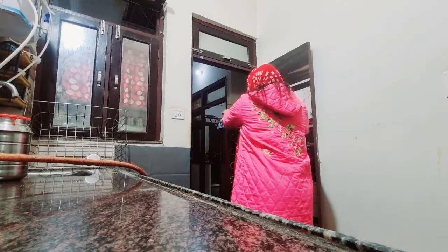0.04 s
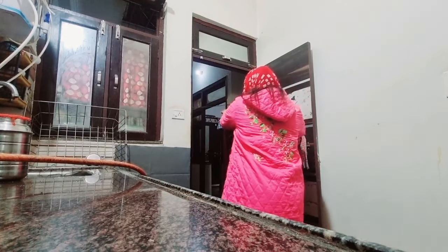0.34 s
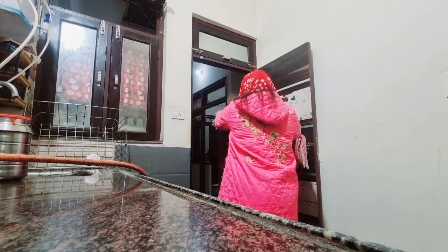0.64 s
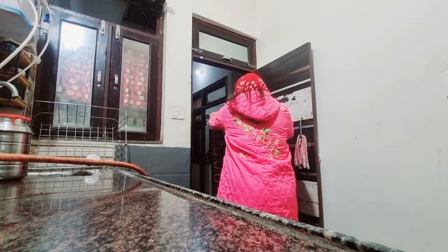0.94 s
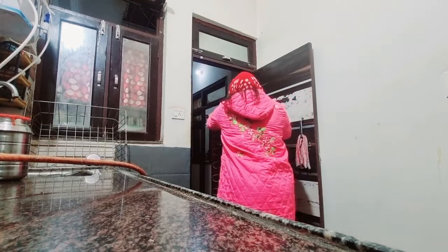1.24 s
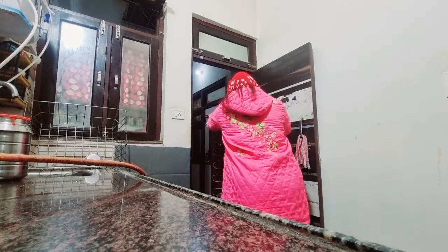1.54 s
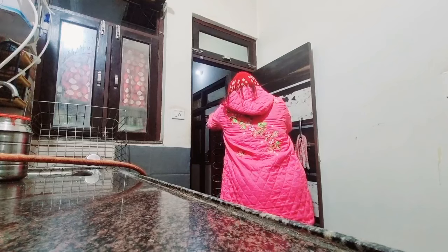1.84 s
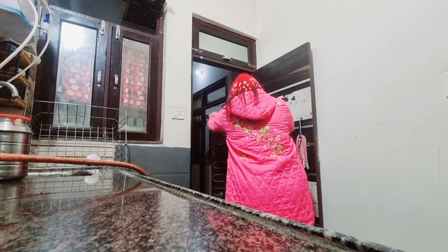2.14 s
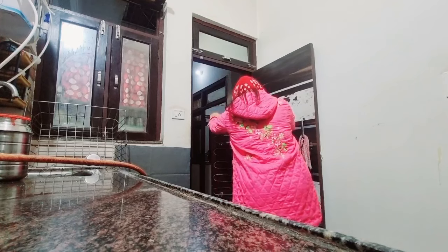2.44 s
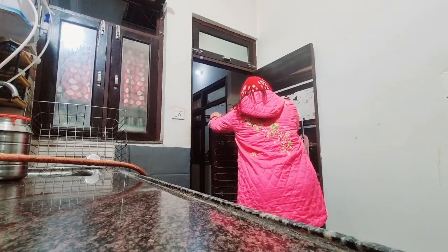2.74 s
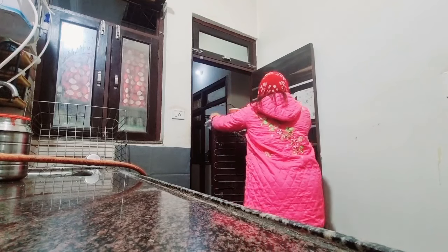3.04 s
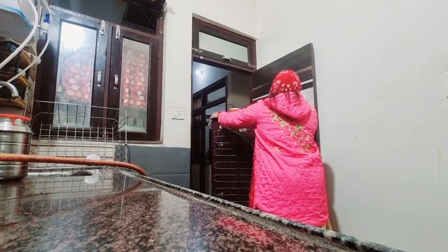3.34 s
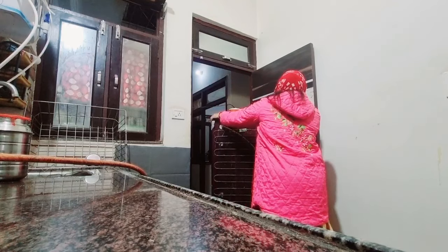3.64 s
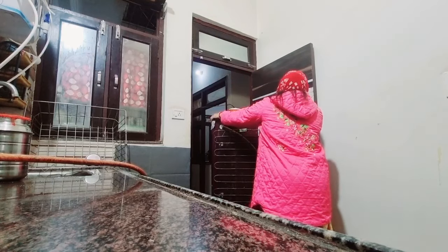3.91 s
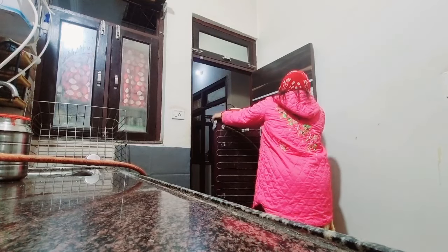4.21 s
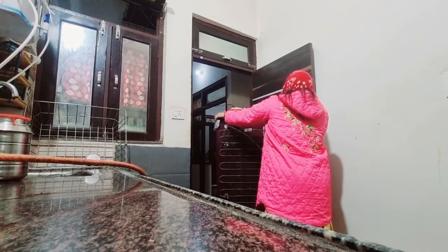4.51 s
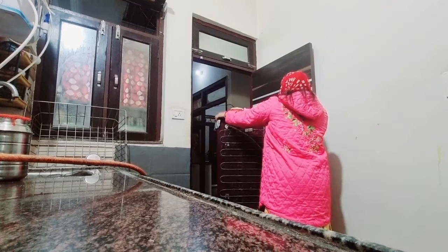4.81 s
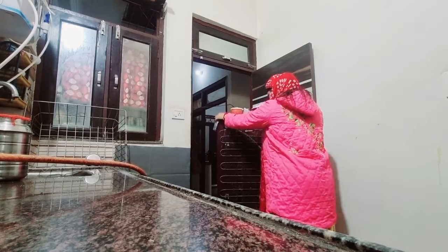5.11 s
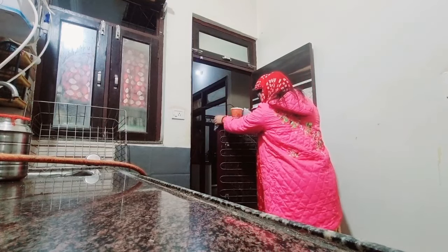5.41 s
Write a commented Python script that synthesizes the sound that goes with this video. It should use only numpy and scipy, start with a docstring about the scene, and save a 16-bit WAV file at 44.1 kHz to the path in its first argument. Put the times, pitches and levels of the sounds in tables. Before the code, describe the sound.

A heavy refrigerator is shoved over a stone floor, its feet juddering, then scraping with a gritty rumble. The casing creaks and the cabinet grumbles before dropping with a sharp, booming knock that jingles its wire shelves. Smaller bumps follow, with scuffing sandals and a faint coat rustle. It is heard in stereo from across a bare, echoing kitchen with a faint hum.

```python
"""A heavy refrigerator is walked over the stone floor of a bare kitchen, across the room from a phone's
two microphones. Its feet stick and slip, juddering and grinding grit, and the casing creaks; it drops
back with a knock that booms in the cabinet and jingles the wire shelves, rocks and is nudged on in
small bumps. The mover's sandals scuff and a quilted coat rustles. Hard walls answer, over room tone
with a faint hum."""
import sys
import numpy as np
from scipy import signal
from scipy.fft import rfft, irfft, next_fast_len
from scipy.io import wavfile
from scipy.ndimage import uniform_filter1d, minimum_filter1d, map_coordinates

SR = 44100
rng = np.random.default_rng(int(sys.argv[2]) if len(sys.argv) > 2 else 0)


def master(y):
    """Save y as 16-bit WAV."""
    cut = np.clip(np.atleast_2d(y).T, -1, 1)
    pcm = np.round(cut * 32767)  # scale
    wavfile.write(sys.argv[1], SR, pcm.astype(np.int16))


N = 249606
TIME = np.arange(N) / SR

# Levels are relative within a table column; each source sets its own overall gain.
# reverberation of the kitchen: f/Hz, t60/s
ROOM_DECAY = [(100, 0.77), (400, 0.52), (1500, 0.47), (5000, 0.43), (12000, 0.33)]
# diffuse sound at the two microphones: f/Hz, left-right correlation
MIC_COHERENCE = [(70, 0.99), (140, 0.97), (280, 0.74), (500, 0.46), (1000, 0), (3000, 0.026)]
# colour difference of the microphones: f/Hz, left over right/dB
MIC_BALANCE = [(100, .6), (400, -0.5), (750, 0), (1250, -4.5), (2400, -0.4), (8000, 1.2), (14000, -4.5)]
# room tone: f/Hz, level/dB
AIR_SPECTRUM = [(20, -48.5), (45, -19), (110, -7), (200, -15.5), (360, -12), (560, -13), (780, -12),
                (1200, -12), (1750, -17), (2600, -25), (4500, -30), (7000, -35.5), (9000, -47),
                (15000, -51.5)]
# narrow bands in the room tone: f/Hz, width/Hz, level/dB
WHINE_BANDS = [(344.4, 11.4, 6.5), (1152, 110, -3.5), (6370, 47, 10), (6445, 30, 10)]
# hum partials: f/Hz, level/dB
HUM_PARTIALS = [(113, -62), (350, -60), (539, -52), (974, -67), (1157, -64)]

# arm movements that rub the coat: t/s, level/dB, rise/s, hold/s, fall/s
ARM_MOVES = [(2.34, -66, 0.09, 0.34, .1), (2.935, -66.5, .05, 0.013, .12), (3.075, -67.5, .08, .02, 0.11),
             (3.39, -55.5, 0.09, 0.037, .09), (4.09, -70.5, .04, 0.34, 0.15), (5.13, -52, 0.15, 0.075, .1),
             (5.46, -61.5, 0.16, .03, .11)]
# sliding cloth: f/Hz, level/dB
RUSTLE_SPECTRUM = [(150, -28), (900, -5.5), (2200, -4.5), (5000, -3), (7500, -7.5), (9500, -12.5),
                   (15000, -14.5)]
# sandals on stone: t/s, level/dB, centre f/Hz, t60/s
SANDAL_SCUFFS = [(1.102, -26.5, 13000, 0.057), (1.561, -43.5, 7340, 0.17), (1.902, -29, 4900, 0.071),
                 (2.519, -17, 3500, 0.061), (2.809, -27.5, 2860, 0.081), (3.211, -30, 4560, 0.077),
                 (3.656, -32.5, 6500, 0.088), (4.575, -47.5, 6470, .12), (4.245, -41, 7400, 0.22),
                 (5.45, -38, 4750, 0.16), (5.504, -32, 1940, 0.11)]

# jolts to the shelves: t/s, level/dB, most excited f/Hz
SHELF_JOLTS = [(0.88, -43, 4100), (1.252, -43, 4400), (1.49, -50, 5200), (2.535, -31.5, 3250),
               (2.548, -36, 5900), (2.54, -37, 8800), (2.688, -39, 4550), (4.27, -44, 3900)]
# ringing shelf wires: f/Hz, level/dB, t60/s
WIRE_MODES = [(3531, 0, .38), (3950, -8, .25), (4210, -2, .33), (5210, -6, .4), (5690, -3, .45),
              (7320, -10, .35), (7698, -4, .42), (8597, -15, .4), (9286, -15, .4), (9582, -10, .35),
              (11040, -8, .3), (11610, -5, .28)]
# single panels set swinging: t/s, f/Hz, level/dB
PANEL_FLEXES = [(0.43, 133.3, -29.5), (.6, 694, -27), (0.712, 595, -14), (0.721, 130.3, -22),
                (0.801, 151.3, -18.5), (0.871, 75.86, -25), (1.455, 205.4, -22.5), (2.411, 141.8, -23),
                (2.531, 311.2, -10), (2.533, 644, -13), (2.536, 234.7, -12.5), (2.659, 77.8, -24),
                (3.13, 187.3, -31.5), (3.766, 151.7, -33), (4.28, 48.7, -38)]
# resonances of the cabinet: f/Hz, width/Hz, level/dB
CABINET_MODES = [(130.7, 16.4, 8), (156.6, 10, 0.5), (200.6, 34, 4.5), (232.8, 8.2, 4), (300.1, 14.2, 9),
                 (347, 16.4, 4.5), (386.6, 12, 5), (427, 28, 6), (588, 27, 2), (681, 20, 4), (740, 17, -4),
                 (770, 15, -10), (865, 31, -3), (960, 22, -14), (1123, 48, -5), (1228, 22, -3)]
# the tilted cabinet sways: t/s, level/dB, rise/s, hold/s, fall/s
SWAYS = [(1.05, -36.5, 0.82, 0.32, 1.5), (2.5, -30, 0.71, 0.41, 1.3), (4.3, -38, 0.43, 0.037, 0.28)]
# grumble of the swaying cabinet: f/Hz, level/dB
SWAY_SPECTRUM = [(15, -47), (33, -13), (45, 12), (58, -17.5), (76, 14), (97, 3), (135, -2), (200, -8),
                 (340, -11.5), (550, -24.5), (2000, -91)]
# creak of the casing: f/Hz, level/dB
CREAK_SPECTRUM = [(120, -19), (200, -4), (330, -11), (480, -11.5), (600, -8.5), (800, -2), (1250, -4.5),
                  (1550, -7), (2100, -10.5), (2800, -20), (4200, -31.5), (7500, -34.5), (14000, -52)]
# resonances of the casing: f/Hz, width/Hz, level/dB
CASING_MODES = [(200, 27, 14.5), (456, 38, 13.5), (716, 30, 6), (1200, 44, -4), (1730, 59, -1.5),
                (4070, 69, 15)]
# shoves that make a foot judder: t/s, level/dB, rise/s, hold/s, fall/s
FOOT_SHOVES = [(0, -17.5, .05, 0.053, 0.15), (1.48, -26.5, 0.12, 0.058, 0.098)]
# a hopping foot: f/Hz, level/dB
JUDDER_SPECTRUM = [(50, -14.5), (76, 3.5), (130, -7), (210, -1), (300, -2.5), (480, -7), (750, -8.5),
                   (1200, -14.5), (2200, -29), (4000, -35), (7000, -43.5), (14000, -54.5)]
# resonances of that foot: f/Hz, width/Hz, level/dB
FOOT_MODES = [(196.4, 32.4, 15), (259, 54, -13), (363.4, 33, 5), (462.8, 11, 12), (830, 97, -31)]

# pulls over the floor: t/s, rumble/dB, scrape/dB, grit/dB, rise/s, hold/s, fall/s
DRAG_PULLS = [(0.598, -26, -27.5, -49.5, 0.37, 0.021, 0.088),
              (0.794, -16.5, -17.5, -40.5, 0.23, 0.089, .16), (1.102, -44, -40, -48, 0.083, 0.012, 0.064),
              (2.484, -28, -32.5, -54, 0.25, 0.075, 0.023), (2.826, -22, -30.5, -63, 0.048, 0.024, 0.094)]
# the dragged cabinet shaking: f/Hz, level/dB
RUMBLE_SPECTRUM = [(15, -51.5), (30, -16), (45, 1), (58, 1.5), (76, 6.5), (97, -6), (135, -4), (200, -13.5),
                   (290, -9), (450, -22.5), (1500, -100)]
# feet scraping stone: f/Hz, level/dB
SCRAPE_SPECTRUM = [(40, -38), (170, -50), (330, -11), (700, 0.5), (950, -6), (1300, -12), (1800, -18),
                   (2500, -27.5), (4000, -27), (15000, -72)]
# crushed grit: f/Hz, level/dB
GRIT_SPECTRUM = [(200, -60), (1200, -24), (2600, -0.5), (4200, -0.5), (7000, -1), (9500, -6.5),
                 (15000, -10)]
# shelf wires ringing along with the grit during the drag: f/Hz, width/Hz, level/dB
WIRE_RING_MODES = [(4230, 200, -6)]

# the cabinet meets the floor: t/s, thud/dB, clack/dB, crack/dB, base rise/s, base t60/s
LANDINGS = [(0.712, -18, -23, -52, 0.0093, 0.16), (0.88, -14, -19, -47, 0.0022, 0.1),
            (2.532, -1, -7.5, -18, 0.011, 0.039), (2.558, 1, -19.5, -28.5, 0.0015, 0.048),
            (2.68, -8, -23.5, -34.5, 0.017, 0.13), (2.83, -16.5, -32.5, -64, 0.012, 0.12),
            (3.136, -30, -43, -61, 0.0059, 0.087), (3.28, -29, -61, -47, 0.012, 0.1),
            (3.77, -21, -30.5, -51, 0.01, 0.066), (4.087, -29.5, -35.5, -59, 0.0099, 0.096),
            (4.253, -25.5, -24.5, -33.5, 0.027, 0.17), (4.276, -18.5, -23, -57, 0.013, 0.087)]
# low body of a landing: f/Hz, level/dB
THUD_SPECTRUM = [(20, -57), (60, -34), (110, -23), (150, 4), (260, 1.5), (440, -2), (560, 0.5), (800, -12),
                 (1300, -34), (3000, -61), (9000, -100)]
# midrange of a landing: f/Hz, level/dB
CLACK_SPECTRUM = [(80, -58), (400, -1.5), (800, -0.5), (1200, 0), (1700, -7), (2600, -24), (6000, -27.5),
                  (15000, -69)]
# loose parts rattling on landing: f/Hz, level/dB
CRACK_SPECTRUM = [(200, -50), (1200, -45), (2600, 8), (5000, 0.5), (7500, -6), (10000, -9.5),
                  (15000, -15.5)]


def amp(db):
    """Decibels to gain."""
    return 10 ** (np.asarray(db) / 20)


def unit(x):
    """Scaled to rms 1."""
    return x / np.sqrt(np.mean(x ** 2) + 1e-20)


def along(points, hz):
    """Points (f/Hz, value) read on a log frequency axis."""
    freqs, values = np.transpose(points)
    return np.interp(np.log(hz + 1), np.log(freqs + 1), values)


def wobble(rate):
    """A smooth random curve, rate knots a second."""
    return map_coordinates(rng.standard_normal(int(N * rate / SR) + 4), [TIME * rate])


def filtered(x, response):
    """x times a response of frequency."""
    n = x.shape[-1]
    padded = next_fast_len(n + 8192, True)
    return irfft(rfft(x, padded) * response(np.fft.rfftfreq(padded, 1 / SR)), padded)[..., :n]


def coloured(x, spectrum, modes=()):
    """x through a broad spectrum with ringing resonances on top, at rms 1."""
    def response(f):
        peaks = sum(amp(db) * 1j * f * width / (hz * hz - f * f + 1j * f * width)
                    for hz, width, db in modes)
        return amp(along(spectrum, f)) * (1 + peaks)
    return unit(filtered(x, response))


def slips(rate_hz, uneven, scatter_db, hiss):
    """Stick-slip jerks at an uneven rate, with some sliding noise between them."""
    phase = np.cumsum(rate_hz * np.exp(uneven * wobble(60))) / SR
    jerks = np.diff(np.floor(phase), prepend=0) * amp(scatter_db * rng.standard_normal(N))
    return unit(jerks) + hiss * rng.standard_normal(N)


def grains(spiky_db, size=N):
    """Countless tiny contacts of very unequal size."""
    return rng.standard_normal(size) * amp(spiky_db * rng.standard_normal(size))


def blow(t, rise, t60):
    """A quick rise and an exponential fall."""
    return (1 - np.exp(-t / rise)) * amp(-60 * t / t60)


def swell(s, rise, hold, fall):
    """An effort builds up to time s, is held and let go; rise and fall are seconds per 20 dB."""
    return 10 ** -(np.maximum(s - TIME, 0) / rise + np.maximum(TIME - s - hold, 0) / fall)


def efforts(rows):
    """The summed gain of swells: t/s, level/dB, rise/s, hold/s, fall/s."""
    return sum(amp(db) * swell(s, *shape) for s, db, *shape in rows)


def add(track, s, sound):
    """Mix a sound into the track at time s."""
    part = track[max(round(s * SR), 0):][:len(sound)]
    part += sound[:len(part)]


def diffuse(pair):
    """Two unrelated signals become a diffuse field: alike in the bass, apart in the treble."""
    angle = lambda hz: np.arccos(np.clip(along(MIC_COHERENCE, hz), -1, 1)) / 2
    mid, side = filtered(pair, lambda hz: np.array([np.cos(angle(hz)), np.sin(angle(hz))]))
    return np.array([mid + side, mid - side])


def kitchen(x, wet_db, pan_db, lag_ms):
    """Direct sound, lag_ms later at the left microphone, plus the answer of the hard walls."""
    sides = np.array([[1], [-1]])
    out = filtered(x, lambda hz: amp(pan_db * sides) * np.exp(-1j * np.pi * hz * sides * lag_ms / 1000))
    hop = SR // 2  # a fresh tail every half second, as the source moves
    for start in range(0, N, hop):
        hz, t, noise = signal.stft(rng.standard_normal((2, SR * 3 // 4)), SR, nperseg=256)
        decay = blow(t, 0.0015, along(ROOM_DECAY, hz)[:, None])
        tail = diffuse(signal.istft(noise * decay, SR, nperseg=256)[1])
        tail = filtered(tail, lambda f: f ** 2 / (f ** 2 + 130 ** 2))  # low cut
        tail *= amp(wet_db) / np.linalg.norm(tail[0])
        for mic, answer in zip(out, signal.fftconvolve(x[None, start:start + hop], tail, axes=1)):
            add(mic, start / SR, answer)
    return out / np.sqrt(1 + 2 * amp(2 * wet_db))


def room_tone():
    """Steady noise from all around, with a thin whine and a wavering hum."""
    air = amp(-45) * coloured(diffuse(rng.standard_normal((2, N))), AIR_SPECTRUM, WHINE_BANDS)
    waver = lambda hz: amp(2 * wobble(7)) * np.sin(2 * np.pi * hz * TIME + 0.8 * wobble(14))
    hum = np.array([sum(amp(db) * waver(hz) for hz, db in HUM_PARTIALS) for mic in range(2)])
    return air + diffuse(hum)


def coat():
    """Quilted cloth slides over itself as the arms move."""
    fibres = grains(spiky_db=4) * amp(1.2 * wobble(50))
    return amp(13) * efforts(ARM_MOVES) * coloured(fibres, RUSTLE_SPECTRUM)


def sandals(press_s=0.0058):
    """Soles press down and brush dusty stone in short bright bursts."""
    track, t = np.zeros(N), np.arange(SR // 2) / SR
    for s, db, hz, t60 in SANDAL_SCUFFS:
        band = lambda f: np.exp(-(np.log((f + 1) / hz) / 0.64) ** 2)
        dust = filtered(grains(spiky_db=5, size=len(t)), band)
        stroke = blow(t, press_s, t60) * (1 - np.exp(-t / press_s))
        add(track, s, amp(db) * unit(dust) * stroke)
    return track


def shelves():
    """Every jolt rings the wires, most of all those near one pitch; each microphone gets its own phase."""
    pair, t = np.zeros((2, N)), np.arange(SR // 2) / SR
    for s, db, centre in SHELF_JOLTS:
        for hz, wire_db, t60 in WIRE_MODES:
            octaves_off = abs(np.log2(hz / centre))
            gain = amp(db + wire_db + rng.normal(0, 1.5) - 32 * octaves_off)
            for mic in pair:
                tone = np.sin(2 * np.pi * hz * t + rng.normal(0, 0.8))
                add(mic, s, gain * tone * blow(t, 0.004, t60))
    return pair


def panels(rise_cycles=2.4, t60_cycles=60, left_lag_ms=0.36):
    """Panels flex as the weight shifts; each takes a few cycles to swing out, and low ones ring longest."""
    pair, t = np.zeros((2, N)), np.arange(SR) / SR
    for s, hz, db in PANEL_FLEXES:
        ring = amp(db + 6) * np.sin(2 * np.pi * hz * t) * blow(t, rise_cycles / hz, t60_cycles / hz)
        add(pair[0], s + left_lag_ms / 1000, ring)
        add(pair[1], s, ring)
    return pair


def sway():
    """The tilted cabinet grumbles softly on its feet in slow slips."""
    jerks = slips(rate_hz=45, uneven=0.65, scatter_db=1, hiss=0.58)
    return amp(1) * efforts(SWAYS) * coloured(jerks, SWAY_SPECTRUM, CABINET_MODES)


def creak():
    """The casing creaks once under the strain: a short run of hard, bright slips."""
    jerks = slips(rate_hz=260, uneven=0.45, scatter_db=2.5, hiss=0.5)
    strain = swell(1.24, rise=0.0031, hold=0.03, fall=0.095)
    return amp(-17) * strain * coloured(jerks, CREAK_SPECTRUM, CASING_MODES)


def judder():
    """A shoved foot hops in quick jerks and drones at its own resonances."""
    jerks = slips(rate_hz=105, uneven=0.3, scatter_db=3, hiss=0.65)
    return amp(4.5) * efforts(FOOT_SHOVES) * coloured(jerks, JUDDER_SPECTRUM, FOOT_MODES)


def drag():
    """Slipping feet shake the cabinet, scrape the stone and crush grit; one effort drives all three."""
    rumble_gain, scrape_gain, grit_gain = sum(np.outer(amp(levels), swell(s, rise, hold, fall))
                                              for s, *levels, rise, hold, fall in DRAG_PULLS)
    jerks = slips(rate_hz=140, uneven=0.6, scatter_db=3.5, hiss=0.45)
    rumble = amp(2.5) * rumble_gain * coloured(jerks, RUMBLE_SPECTRUM, CABINET_MODES)
    scrape = amp(1) * scrape_gain * coloured(jerks, SCRAPE_SPECTRUM, CABINET_MODES)
    dust = grains(spiky_db=4.5) * amp(3 * wobble(70))
    grit = amp(4) * grit_gain * coloured(dust, GRIT_SPECTRUM, WIRE_RING_MODES)
    return rumble + scrape + grit


def landings(boom_hz=76.3, boom_t60_s=1.64):
    """Each landing is a cluster of contacts that thuds in the cabinet and sets off its deep note."""
    track, t = np.zeros(N), np.arange(SR) / SR
    contacts = lambda spectrum, modes=(): coloured(grains(spiky_db=3, size=SR), spectrum, modes)
    for s, thud_db, clack_db, crack_db, rise, settle in LANDINGS:
        thud = amp(thud_db - 0.5) * contacts(THUD_SPECTRUM, CABINET_MODES) * blow(t, rise, 2 * settle)
        clack = amp(clack_db + 7.5) * contacts(CLACK_SPECTRUM, CABINET_MODES)
        clack *= blow(t, rise, 1.13 * settle)
        # loose parts take a little longer to start rattling
        crack = amp(crack_db + 14) * contacts(CRACK_SPECTRUM) * blow(t, 2 * rise, 0.88 * settle)
        boom = amp(thud_db - 20.5) * np.sin(2 * np.pi * boom_hz * t) * blow(t, 0.0057, boom_t60_s)
        add(track, s - 0.003, thud + clack + crack + boom)
    return track


def scene():
    """Refrigerator and mover are across the kitchen, near the middle of the stereo image."""
    sliding = kitchen(drag() + judder() + creak() + sway(), wet_db=5, pan_db=0.3, lag_ms=0.514)
    knocks = kitchen(landings(), wet_db=-1, pan_db=0.9, lag_ms=-0.15)
    mover = kitchen(sandals() + coat(), wet_db=0.5, pan_db=-1, lag_ms=0.559)
    return sliding + knocks + mover + shelves() + panels() + room_tone()


def record(dry):
    """The phone's two microphones differ a little in colour; a limiter and a band limit follow."""
    ceiling, top_hz = 0.88, 15500
    heard = filtered(dry, lambda hz: amp(np.outer([0.5, -0.5], along(MIC_BALANCE, hz))))
    needed_gain = ceiling / np.maximum(abs(heard).max(axis=0), ceiling)
    eased_gain = uniform_filter1d(minimum_filter1d(needed_gain, size=801), size=401)
    return filtered(heard * eased_gain, lambda hz: hz < top_hz)


dry = scene()
out = record(dry)
master(out)
```